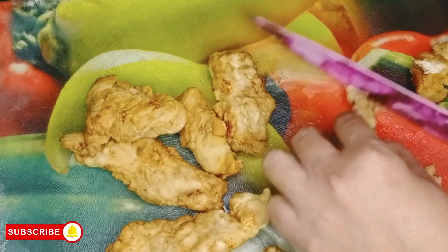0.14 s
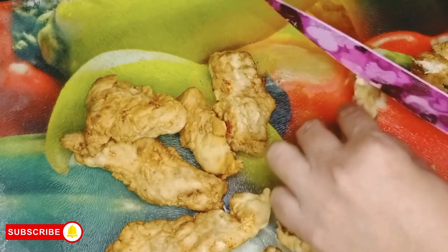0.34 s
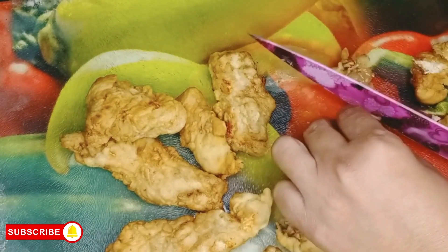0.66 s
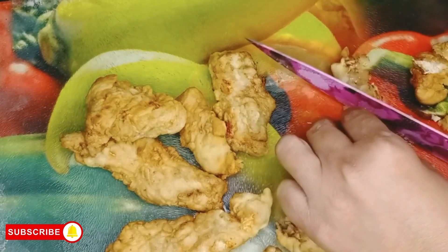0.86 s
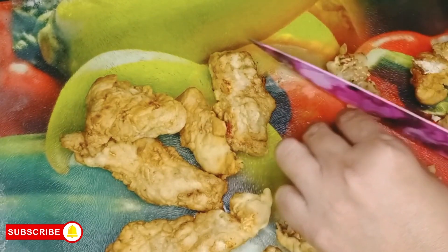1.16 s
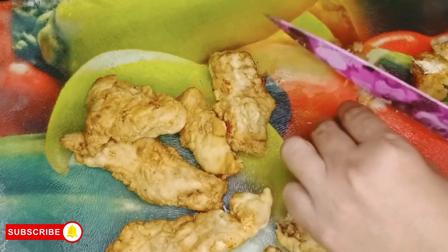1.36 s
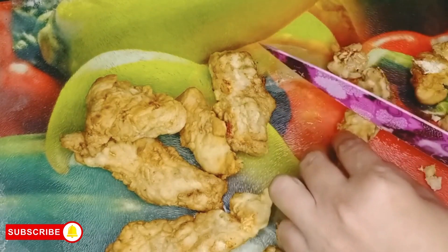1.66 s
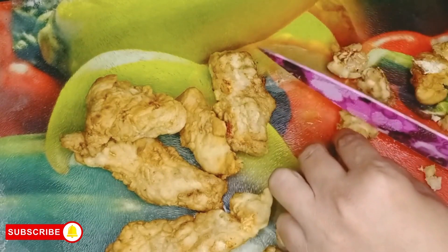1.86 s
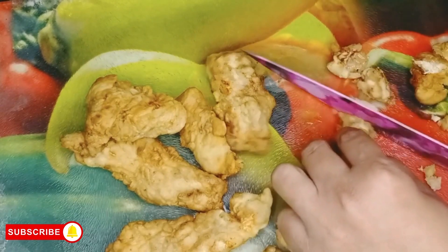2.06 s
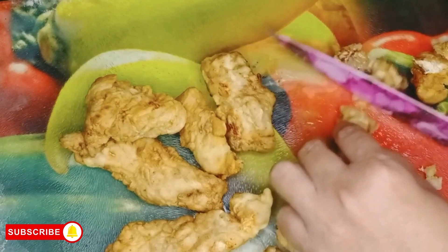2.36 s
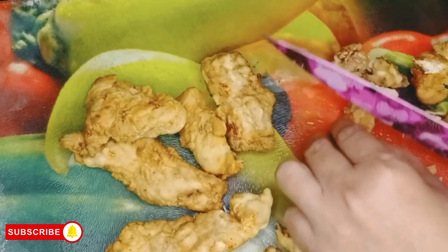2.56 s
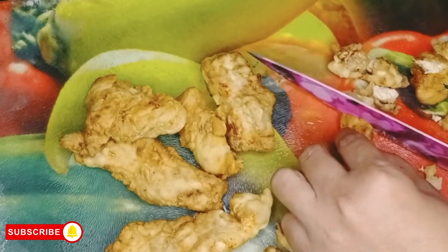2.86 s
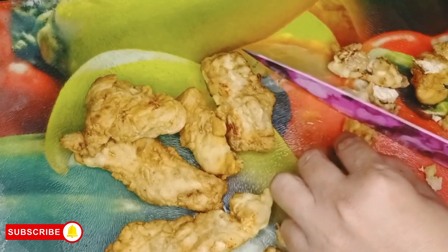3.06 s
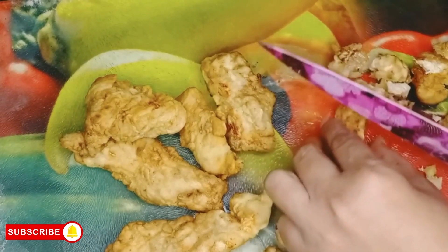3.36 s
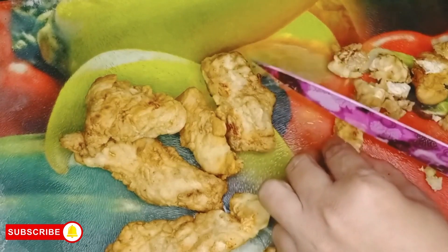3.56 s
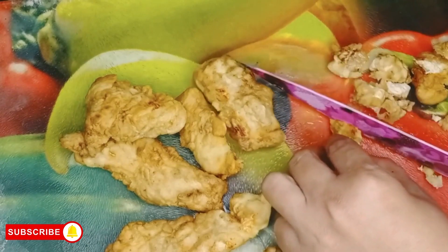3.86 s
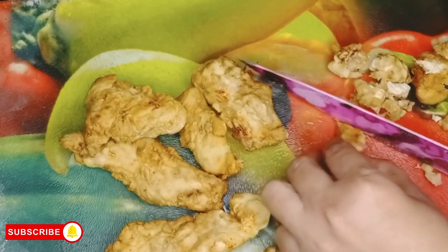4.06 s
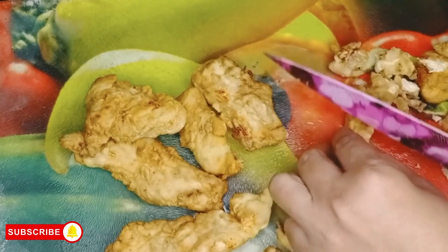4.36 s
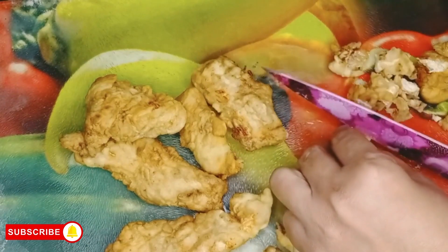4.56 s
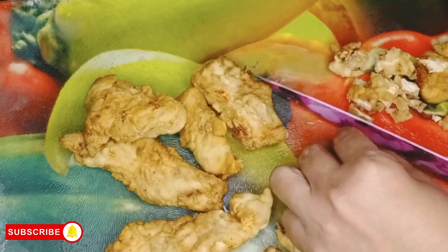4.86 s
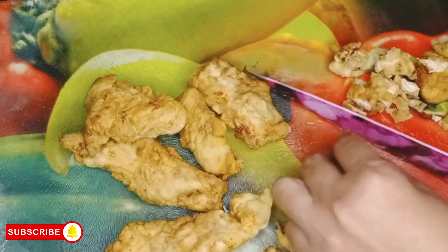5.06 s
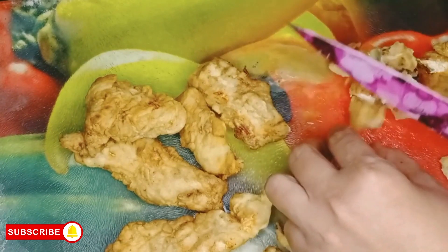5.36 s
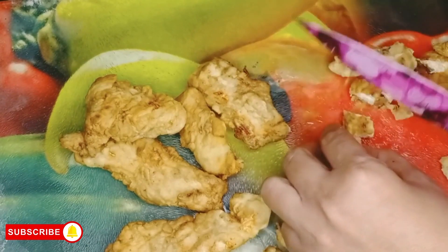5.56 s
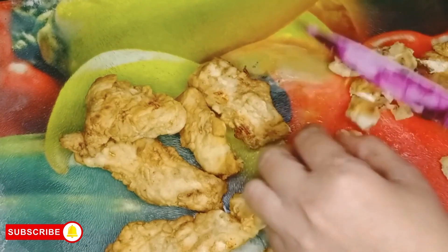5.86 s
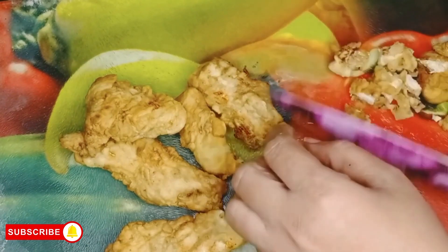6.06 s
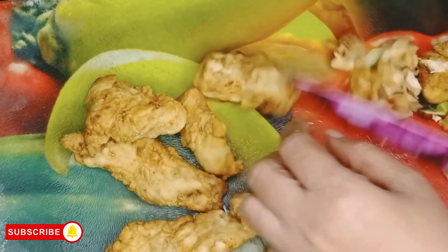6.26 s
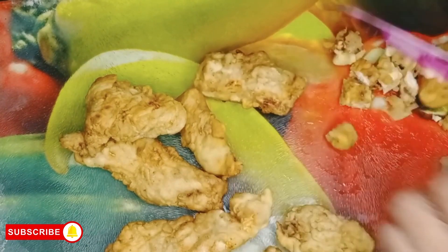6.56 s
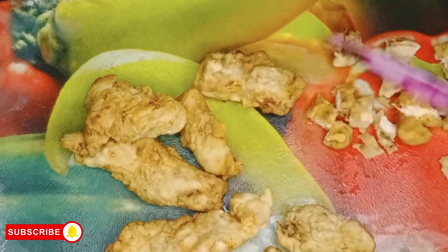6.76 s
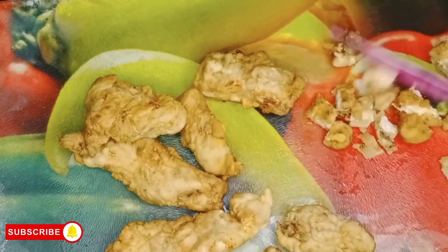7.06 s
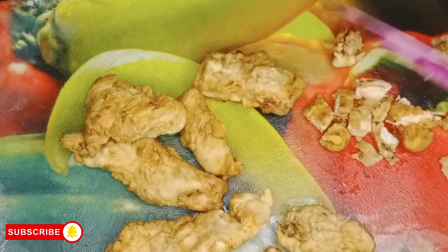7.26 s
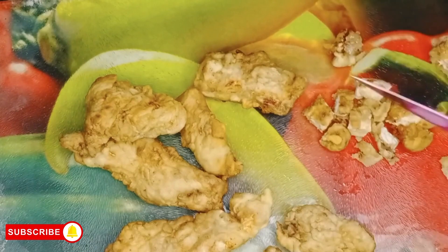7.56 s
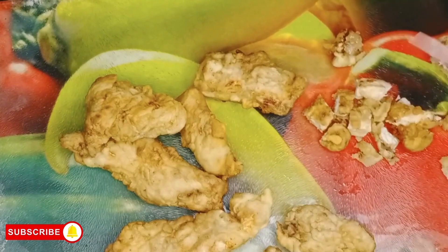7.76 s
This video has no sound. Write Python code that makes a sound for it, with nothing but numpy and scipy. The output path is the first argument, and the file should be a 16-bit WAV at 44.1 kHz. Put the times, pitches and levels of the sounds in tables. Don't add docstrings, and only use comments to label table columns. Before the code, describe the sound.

Brittle crust snaps under a knife, with ringing blade knocks and short chattering scrapes on a glass cutting board, thinning into near silence.

```python
import sys
import numpy as np
from scipy import signal
from scipy.fft import rfft, irfft
from scipy.io import wavfile
from scipy.ndimage import uniform_filter1d, minimum_filter1d, map_coordinates

SR = 44100
rng = np.random.default_rng(int(sys.argv[2]) if len(sys.argv) > 2 else 0)


def master(y):
    cut = np.clip(np.atleast_2d(y).T, -1, 1)
    pcm = np.round(cut * 32767)
    wavfile.write(sys.argv[1], SR, pcm.astype(np.int16))


def amplitude_ratio(level_db):
    exponent = np.asarray(level_db, float) / 20
    return 10 ** exponent


N = 348810

# f/Hz, level/dB
HUSH_COLOUR = [(15, -35.5), (30, -6.5), (193, -6), (297, -9.5), (322, -3.5), (368, -9.5), (567, -10.5),
               (762, -14), (1080, -14.5), (1240, -15), (3440, -19), (6380, -33.5), (7910, -29.5),
               (9810, -35), (15500, -36)]
# t/s, level/dB
HUSH_LEVEL = [
    (0.0, -63.5),
    (7.91, -63.5),
]
# start t/s, length/s, hiss level/dB
FINGER_SLIDES = [
    (0.1, 0.47, -78),
    (5.15, .55, -81),
    (5.9, .7, -79),
    (6.8, 0.86, -77),
]
# f/Hz, width/Hz, level/dB
SKIN_BAND = [(7930, 1700, 0)]
# f/Hz, t60/s
ROOM_DECAY = [(200, 0.73), (600, 0.28), (2000, 0.28), (5000, 0.3), (12000, 0.25)]
# t/s, peak level/dB
BLADE_TAPS = [
    (0.2907, -20.5),
    (0.2934, -17.5),
]
# f/Hz, width/Hz, level/dB
BLADE_MODES = [(755, 670, -15.5), (1570, 290, -8), (2460, 210, -1.5), (2680, 200, -17), (4140, 110, -3.5),
               (3270, 500, -18), (1980, 300, -10.5), (6020, 480, -15), (7450, 170, -13), (8260, 360, -16)]
# t/s, peak level/dB, brightness/(dB per octave)
CRUST_SNAPS = [(0.2878, -29.5, -7), (0.376, -34, 4), (0.5255, -26.5, -1), (0.5852, -23.5, -1),
               (0.6235, -30.5, -14), (0.656, -31, 3), (0.6978, -23.5, -3.5), (0.797, -29.5, -6.5),
               (1.1109, -25.5, -1), (1.617, -26, 1.5), (1.69, -35.5, -2), (1.7533, -31.5, -5),
               (1.8522, -27, -6.5), (1.898, -31, 3), (2.1232, -28, -3.5), (2.4666, -35, 0),
               (2.596, -19, -4), (2.7673, -25.5, -7), (3.3563, -31.5, 4), (3.4423, -26, 7),
               (3.7182, -26.5, -7), (3.7362, -16.5, -8.5), (3.9603, -35.5, 3.5), (4.2531, -35, 0.5),
               (4.3751, -24.5, 0), (4.4863, -33.5, 11), (6.11, -35, -3.5), (6.4633, -30, 6),
               (6.812, -37.5, -0.5), (6.9215, -38, -7)]
# t/s, peak level/dB
CRUMB_TICKS = [(0.1055, -49), (0.1344, -43), (0.1596, -40.5), (0.1986, -37.5), (0.2588, -51), (0.462, -44),
               (0.9252, -39), (1.476, -45), (1.588, -37), (2.5371, -39), (2.889, -41), (3.3232, -37),
               (3.4158, -36), (3.6004, -40), (3.6327, -39.5), (4.5176, -39), (4.5976, -36), (4.731, -42),
               (4.7675, -41), (4.966, -47.5), (5.0255, -49), (5.234, -51.5), (5.5695, -36.5), (5.6386, -51),
               (5.9439, -43), (6.028, -45), (6.4383, -50), (6.7965, -49.5), (6.8273, -39.5),
               (7.1799, -44.5)]
# hardest moment t/s, crunch level/dB, rise/s, fall/s
CRUNCH_STROKES = [(0.0, -60, .01, 0.1), (.15, -77, .1, .6), (.588, -58, 0.31, 0.27),
                  (.846, -54, 0.26, 0.085), (1.08, -64.5, .09, 0.25), (1.516, -59.5, 0.081, 0.029),
                  (1.746, -62, 0.34, .4), (1.926, -55, .3, 0.11), (2.2, -59, .13, 0.056),
                  (2.47, -59.5, 0.045, 0.36), (2.636, -42.5, 0.074, 0.2), (2.98, -59, 0.34, 0.094),
                  (3.372, -76, 0.083, .2), (3.465, -48.5, 0.092, 0.076), (3.746, -59.5, 0.49, .32),
                  (4.03, -67, 0.18, 0.069), (4.382, -46.5, 0.03, 0.045), (4.466, -70, 0.28, 0.26),
                  (4.622, -53.5, 0.19, .133), (4.95, -77, 0.52, .2), (5.96, -59.5, 0.034, 0.33),
                  (6.15, -74, .1, 0.12), (6.37, -66, .02, 0.54), (6.95, -73.5, .3, .1)]
# f/Hz, level/dB
CRUST_COLOUR = [(880, -41), (1500, -16), (2160, -12), (3250, -1.5), (4080, -3), (5220, -9), (6500, -2),
                (8400, 5.5), (11000, -9.5), (14900, -4.5), (16000, -21.5)]
# t/s, peak level/dB, table thud level/dB, brightness/(dB per octave)
CHOPS = [(0.586, -32.5, -69, 6), (0.599, -29.5, -51, 3), (0.624, -27, -49, -1), (0.654, -34, -48, 6.5),
         (0.696, -22, -60, -6.5), (0.788, -18, -67, -3.5), (0.809, -23.5, -54, 0.5),
         (0.928, -37.5, -51, 5.5), (0.96, -44, -45, -3), (1.026, -21, -52, -1.5), (1.054, -20, -54, -2),
         (1.103, -16.5, -42.5, -5.5), (1.111, -11, -75.5, 0), (1.756, -33, -56, -12),
         (1.85, -19.5, -46.5, -4), (1.899, -5, -35.5, 1), (2.1035, -22, -51, 2.5), (2.123, -18, -42.5, 1),
         (2.595, -30.5, -71, -7.5), (2.61, -37.5, -52, -12), (2.646, -14, -33, -1.5), (2.699, -24, -57, -2),
         (2.741, -18.5, -46, -2.5), (2.916, -15.5, -45, -3), (2.946, -19, -39, -5),
         (3.46, -32, -46.5, -0.5), (3.64, -30.5, -70, -10.5), (3.735, -7.5, -41, 2.5),
         (3.941, -21.5, -52, -0.5), (4.698, -23.5, -53.5, -2.5)]
# t/s, peak level/dB, brightness/(dB per octave)
TOUCHES = [(0.481, -49, 13), (1.415, -39.5, -3), (1.481, -41, 6), (1.818, -46, 0), (2.892, -36, -8),
           (3.299, -42.5, -7), (3.326, -39.5, -3.5), (3.602, -38, -1), (4.379, -36.5, -4.5),
           (4.63, -37.5, 0), (4.711, -44, 6), (4.88, -43, 5), (5.148, -41, -0.5), (5.236, -44.5, 1),
           (5.347, -49.5, 6), (5.741, -43.5, 1.5), (6.046, -44.5, 9), (6.474, -41, 6), (6.815, -48, 2),
           (6.921, -46.5, -2.5)]
# t/s, peak level/dB
HAND_BUMPS = [
    (0.598, -59),
    (0.836, -56),
    (1.119, -64),
    (1.903, -55),
    (2.641, -60.5),
    (2.74, -58),
    (3.465, -66),
    (3.73, -49),
    (4.628, -53.5),
    (4.771, -57),
]
# hardest moment t/s, chatter level/dB, rise/s, fall/s
SWEEPS = [(0.0, -44.5, .01, 0.055), (1.06, -31.5, 0.13, 0.094), (1.112, -23, 0.0084, 0.067),
          (1.89, -36.5, 0.12, .01), (2.112, -25, .012, 0.067), (2.135, -18.5, .03, 0.045),
          (2.149, -13, .04, 0.034), (2.166, -13.5, 0.037, 0.086), (2.644, -27.5, 0.044, 0.044),
          (2.752, -36, 0.013, 0.11), (3.462, -40.5, 0.043, 0.12), (3.732, -27, 0.024, .02),
          (4.56, -57, 0.18, 0.021), (4.64, -46.5, 0.067, 0.039), (4.776, -47.5, 0.12, 0.04),
          (4.95, -57.5, 0.33, 0.019), (5.35, -57, 0.036, .08), (5.952, -67, 0.037, .2),
          (6.058, -54, 0.097, 0.12), (6.132, -64, 0.12, .06), (6.194, -57, .03, 0.13),
          (6.506, -43.5, 0.068, 0.063)]
# start t/s, length/s, chatter level/dB
SAWING = [
    (.55, 0.17, -55.5),
    (.7, 0.19, -49.5),
    (.924, 0.073, -41.5),
    (1.4, 0.1, -71),
    (1.7, 0.069, -63),
    (2.69, 0.03, -42.5),
    (3.58, 0.15, -59.5),
    (3.76, 0.08, -49),
    (4.36, .1, -78),
    (5.95, 0.288, -93),
]
# hardest moment t/s, chatter level/dB, rise/s, fall/s
RIM_SHOVES = [
    (2.893, -44, .012, .1),
    (2.962, -19, 0.071, 0.037),
    (2.985, -29.5, 0.051, .1),
    (3.972, -27.5, .1, 0.078),
    (4.005, -20.5, 0.043, 0.047),
    (4.027, -26, 0.047, 0.081),
]
# f/Hz, width/Hz, level/dB
STRUCK_MODES = [(920, 25, 2.5), (1131, 18, -1.5), (1337, 10, -2), (1525, 27, 0), (2130, 180, -12),
                (2280, 49, -10), (2510, 43, -10), (2860, 39, -4), (3360, 56, -9.5), (4200, 48, -21)]
# f/Hz, width/Hz, level/dB
SLIDING_MODES = [(853, 210, -2), (1132, 18, -2.5), (1337, 11, -5.5), (1550, 69, -7.5), (2030, 45, -3),
                 (2420, 64, -9), (2836, 39, -4), (3374, 47, -10), (3713, 67, -17.5), (1687, 30, -9),
                 (3970, 140, -24.5)]
# f/Hz, width/Hz, level/dB
RIM_MODES = [(806, 150, -3.5), (887, 53, 4), (1136, 41, -2.5), (1347, 31, -5.5), (1495, 35, -5),
             (1686, 11, 0.5), (2025, 33, -5), (2830, 97, -18), (3440, 390, -19)]
# f/Hz, level/dB
SLAB_COLOUR = [(71, -77.5), (120, -41.5), (381, -16), (600, -16), (793, -2.5), (1240, -20), (1560, -9),
               (1780, -16), (2830, -15), (3110, -18), (4950, -42.5), (8160, -25.5), (12000, -51),
               (15600, -79), (22000, -120)]
# f/Hz, level/dB
TABLE_COLOUR = [(90, -35.5), (180, -8), (300, -1), (450, -1), (800, -34.5)]
# f/Hz, level/dB
COUNTER_COLOUR = [(35, -29), (70, -3.5), (100, 2.5), (150, -8), (260, -36.5)]
# f/Hz, level/dB
TREBLE_HOLES = [(7500, -58), (8800, -36), (11000, -35), (15000, -37)]


def unit(x):
    return x / np.sqrt(np.mean(x ** 2) + 1e-20)


def along(points, hz):
    f, v = np.transpose(points)
    return np.interp(np.log(hz + 1), np.log(f + 1), v)


def resonances(modes, f):
    power = 0
    for centre, width, db in modes:
        damping = (f * width) ** 2
        power = power + amplitude_ratio(2 * db) * damping / ((centre * centre - f * f) ** 2 + damping)
    return power


def causal(gain, size=8192):
    cepstrum = irfft(np.log(gain(np.fft.rfftfreq(size, 1 / SR)) + 1e-6), size)
    cepstrum[1:size // 2] *= 2
    cepstrum[size // 2 + 1:] = 0
    response = irfft(np.exp(rfft(cepstrum)), size)[:size // 2]
    return response / np.linalg.norm(response)


def through(x, gain):
    return signal.fftconvolve(x, causal(gain))[:N]


def wobble(rate):
    knots = rng.standard_normal(int(N * rate / SR) + 4)
    return map_coordinates(knots, [np.arange(N) * rate / SR])


def strokes(rows, size=16):
    swell_db = 30
    t = np.arange(0, N, size) / SR
    gain = 0
    for s, db, rise, fall in rows:
        away = np.maximum((s - t) / max(rise, .002), (t - s) / max(fall, .002))
        gain = gain + amplitude_ratio(db - swell_db * away)
    return np.interp(np.arange(N) / SR, t, gain)


def holds(rows):
    t = np.arange(N) / SR
    gain = 0
    for s, length, db in rows:
        inside = np.minimum(t - s, s + length - t)
        gain = gain + amplitude_ratio(db) * np.clip(inside / 0.0073 + .5, 0, 1)
    return gain


def grains(rate, spread_db):
    hit, size, sign = rng.random((3, N))
    height = amplitude_ratio(-spread_db * np.log(size + 1e-4))
    return unit((hit < rate / SR) * height * np.sign(sign - .5))


def bursts(rows, spike, attack_s=0.0011):
    size, lead, rise = 4096, 256, 16
    out = np.zeros(N + 2 * size)
    t, hz = np.arange(size - lead) / SR, np.fft.rfftfreq(size, 1 / SR)
    attack = 1 - np.exp(-t / max(attack_s, 1e-4))
    for s, db, tilt_db, pivot_hz, t60 in rows:
        noise = rng.standard_normal(len(t)) * amplitude_ratio(-60 * t / max(t60, .001)) * attack
        noise /= np.linalg.norm(noise)
        noise[rise] += spike
        tilt = amplitude_ratio(tilt_db * np.log2((hz + 200) / pivot_hz))
        burst = irfft(rfft(np.pad(noise, (lead, 0))) * tilt, size)
        out[round(s * SR):][:size] += amplitude_ratio(db) * burst / np.sqrt(1 + spike ** 2)
    return out[lead:N + lead]


def hush():
    z = signal.stft(rng.standard_normal(N), nperseg=512)[2]
    patches = uniform_filter1d(rng.standard_normal(z.shape), 6, axis=0)
    patches = uniform_filter1d(patches, 14, axis=1)
    air = signal.istft(z * amplitude_ratio(0.6 * unit(patches)), nperseg=512)[1][:N]
    air = unit(through(air, lambda f: amplitude_ratio(along(HUSH_COLOUR, f))))
    s, db = np.transpose(HUSH_LEVEL)
    return air * amplitude_ratio(np.interp(np.arange(N) / SR, s, db))


def kitchen(x, block=12288):
    out = np.zeros(N + block + SR)
    for start in range(0, N, block):
        hz, t, z = signal.stft(rng.standard_normal(SR // 2), SR, nperseg=256)
        decay = amplitude_ratio(-60 * t / along(ROOM_DECAY, hz)[:, None])
        tail = signal.istft(z * decay, SR, nperseg=256)[1]
        wet = signal.fftconvolve(x[start:start + block], tail / np.linalg.norm(tail))
        out[start + 130:][:len(wet)] += wet
    return out[:N]


def fingers():
    skin = holds(FINGER_SLIDES) * amplitude_ratio(3.5 * wobble(8.1)) * rng.standard_normal(N)
    return through(skin, lambda f: resonances(SKIN_BAND, f))


def blade():
    blows = bursts([(s, db + 11, 0, 3000, .012) for s, db in BLADE_TAPS], spike=0.44)

    def steel(f):
        return np.sqrt(resonances(BLADE_MODES, f)) / (1 + (600 / (f + 1)) ** 4) / (1 + (f / 9500) ** 8)
    return through(blows, steel)


def crust():
    snap_rows = [(s, db + 6.5, np.clip(tilt, -7, 9), 8000, .015) for s, db, tilt in CRUST_SNAPS]
    snaps = bursts(snap_rows, spike=0.1, attack_s=0.01)
    ticks = bursts([(s, db + 7, 3, 8000, .024) for s, db in CRUMB_TICKS], spike=0.1, attack_s=0.0013)
    clumps = unit(amplitude_ratio(3.3 * wobble(69)) * grains(4000, spread_db=4.0))
    crumbs = strokes(CRUNCH_STROKES) * amplitude_ratio(-2.0) * clumps

    def colour(f):
        return amplitude_ratio(along(CRUST_COLOUR, f)) / (1 + (900 / (f + 1)) ** 4)
    return through(snaps + crumbs, colour), through(ticks, colour)


def glass(modes, f):
    slab = amplitude_ratio(2 * (along(SLAB_COLOUR, f) - 0.5))
    ring = np.sqrt(slab + resonances(modes, f) / (1 + (f / 4500) ** 4))
    return ring / (1 + (f / 11000) ** 4) / (1 + (330 / (f + 1)) ** 4)


def slid_glass(x, modes):
    return through(x, lambda f: glass(modes, f) * amplitude_ratio(-5.5 / (1 + (f / 710) ** 12)))


def board():
    touch_thud_db = -20.5
    knocks = CHOPS + [(s, db, db + touch_thud_db, tilt) for s, db, tilt in TOUCHES]
    blows = bursts([(s, db + 10.5, np.clip(tilt, -6, 6), 1500, .018) for s, db, _, tilt in knocks], spike=0.6)
    thuds = bursts([(s, thud + 21.0, 0, 300, .03) for s, _, thud, _ in knocks], spike=0.14)
    bumps = bursts([(s, db + 26.0, 0, 100, .12) for s, db in HAND_BUMPS], spike=.1)
    low = through(thuds, lambda f: amplitude_ratio(along(TABLE_COLOUR, f)))
    low = low + through(bumps, lambda f: amplitude_ratio(along(COUNTER_COLOUR, f)))
    slips = unit(amplitude_ratio(2.6 * wobble(140)) * grains(3200, spread_db=0.48))
    chatter = (strokes(SWEEPS) + holds(SAWING)) * amplitude_ratio(-4.0) * slips
    shoves = strokes(RIM_SHOVES) * amplitude_ratio(-4.5) * slips
    struck = through(blows, lambda f: glass(STRUCK_MODES, f))
    return struck + slid_glass(chatter, SLIDING_MODES) + slid_glass(shoves, RIM_MODES) + low


def scene():
    hard = board() + blade()
    crisp, ticks = crust()
    room = kitchen(amplitude_ratio(-4.0) * hard + amplitude_ratio(-0.5) * crisp + amplitude_ratio(-1.5) * ticks)
    mono = hard + crisp + ticks + room + hush() + fingers()
    return np.array([mono, mono])


def thin_treble(x, size=2048, order=20):
    hz, _, z = signal.stft(x, SR, nperseg=size)
    band = np.arange(len(hz)) // order
    power = np.add.reduceat(abs(z[0]) ** 2, np.arange(0, len(hz), order), axis=0)
    power_db = 10 * np.log10(power + 1e-20)
    top_db = power_db.max(axis=0)
    recent_db = -minimum_filter1d(-top_db, size=9, origin=4) - 22
    spare_db = np.clip(np.percentile(top_db, 30) + 10 - top_db, -2, 10)
    margin_db = (power_db - np.maximum(top_db, recent_db) + spare_db)[band]
    margin_db = margin_db - along(TREBLE_HOLES, hz)[:, None]
    chance = unit(uniform_filter1d(rng.standard_normal((3,) + power_db.shape), size=3, axis=2))
    luck_db = (3 * chance[2] + 7 * chance[:2])[:, band]
    keep = np.maximum(margin_db, -2) + luck_db > 0
    coarse = amplitude_ratio(np.clip(4 - .7 * margin_db, 0, 11))
    passband = (hz < 15850) / (1 + (30 / (hz + 1)) ** 2)
    return signal.istft(z * keep * coarse * passband[:, None], SR, nperseg=size)[1][:, :N]


def roll_off(x):
    return signal.sosfilt(signal.butter(12, 16600, fs=SR, output="sos"), x)


def record(dry):
    mix = thin_treble(dry)
    return roll_off(mix)


dry = scene()
out = record(dry)
master(out)
```